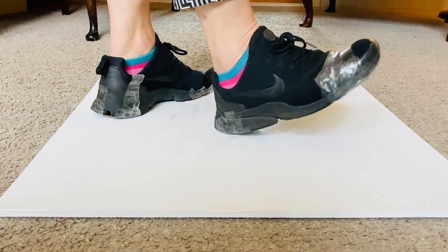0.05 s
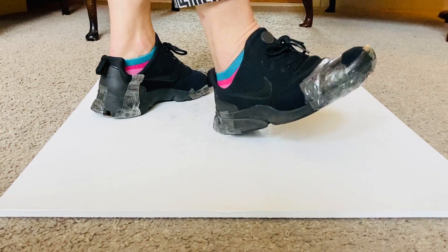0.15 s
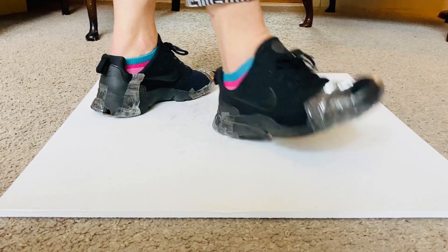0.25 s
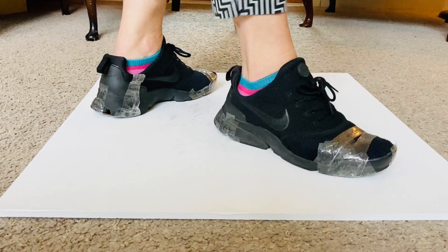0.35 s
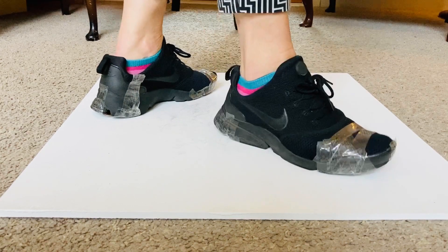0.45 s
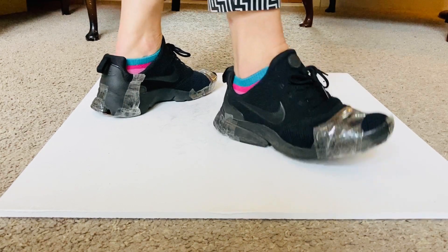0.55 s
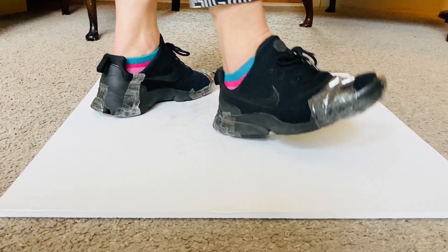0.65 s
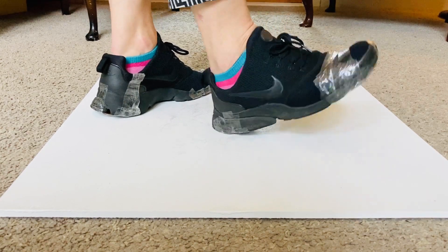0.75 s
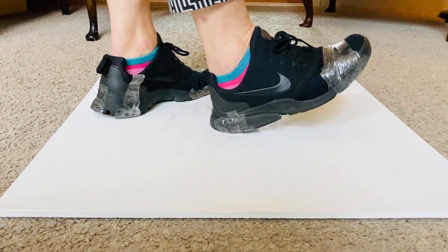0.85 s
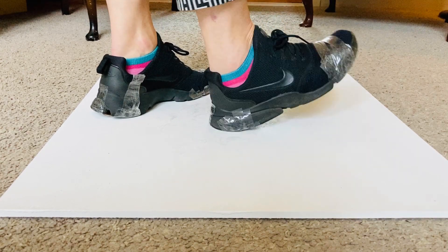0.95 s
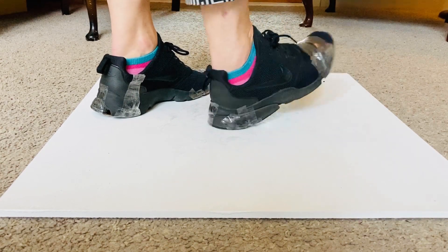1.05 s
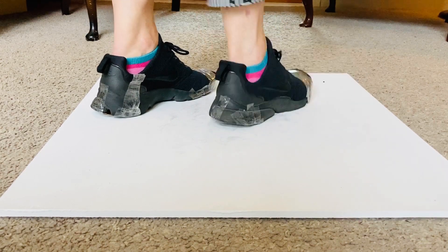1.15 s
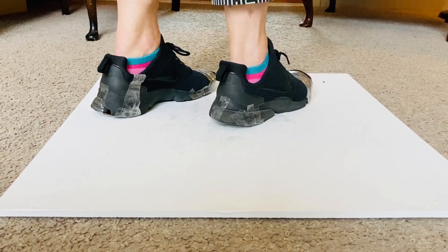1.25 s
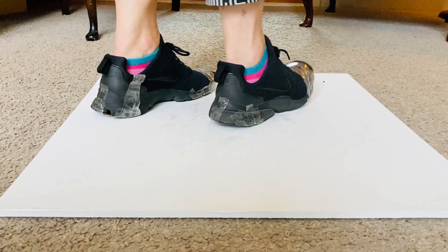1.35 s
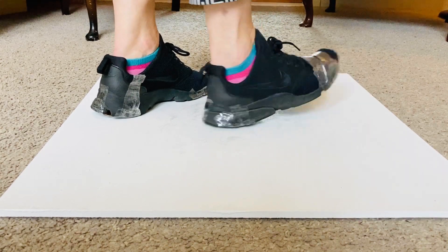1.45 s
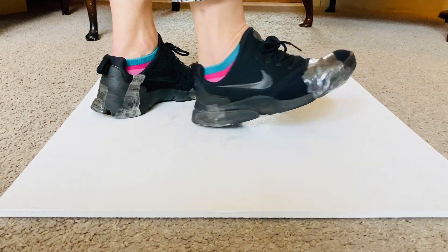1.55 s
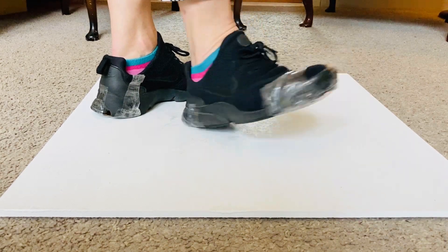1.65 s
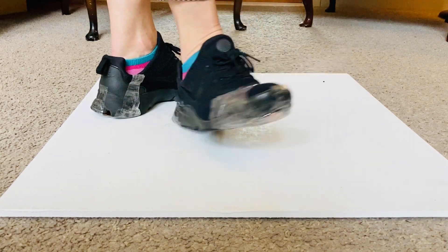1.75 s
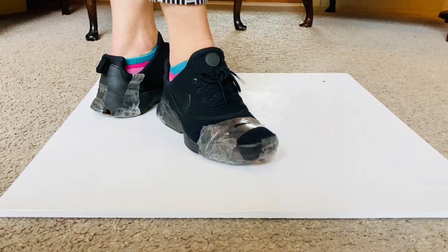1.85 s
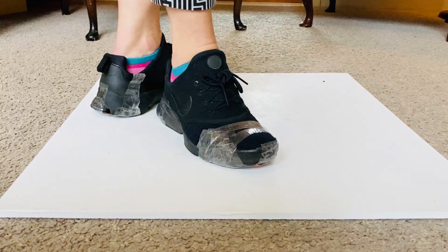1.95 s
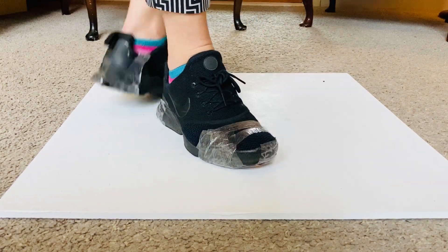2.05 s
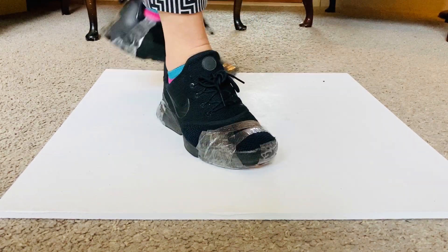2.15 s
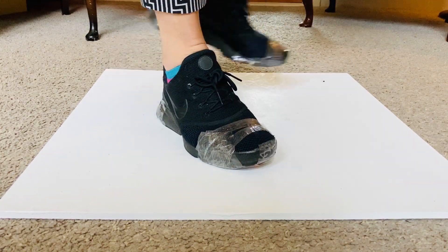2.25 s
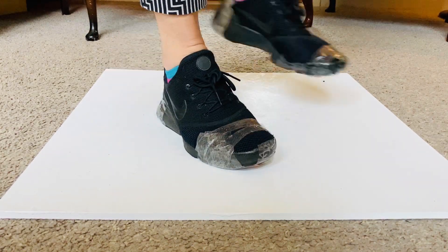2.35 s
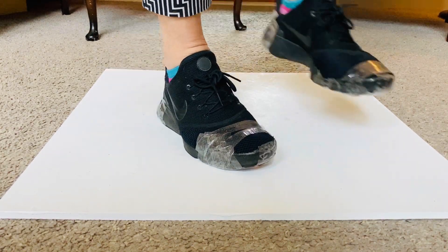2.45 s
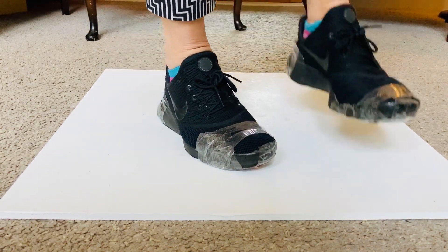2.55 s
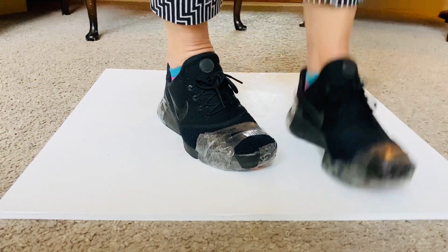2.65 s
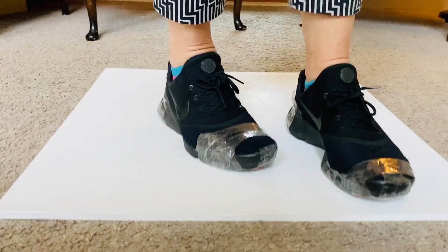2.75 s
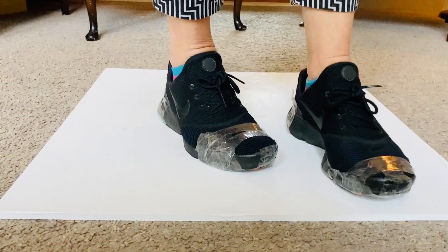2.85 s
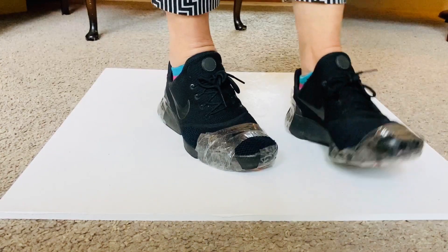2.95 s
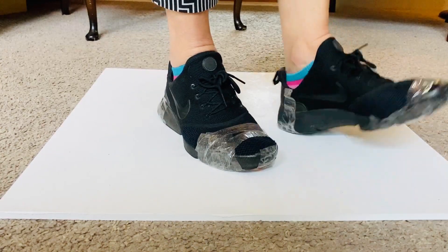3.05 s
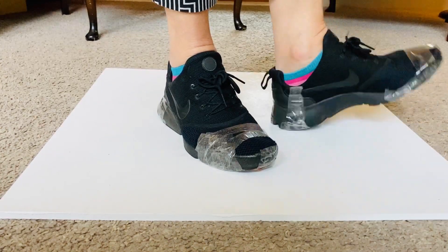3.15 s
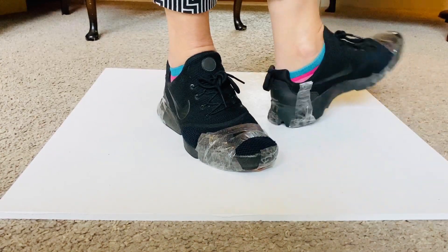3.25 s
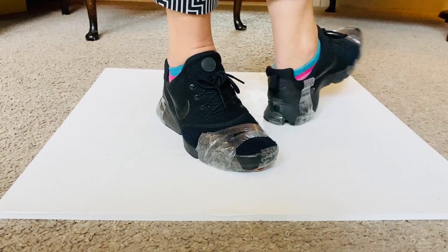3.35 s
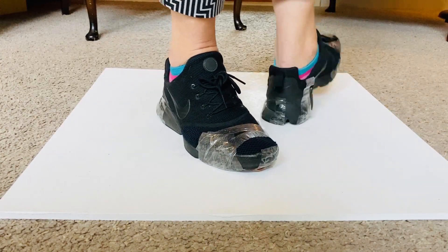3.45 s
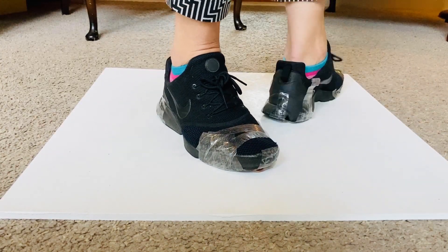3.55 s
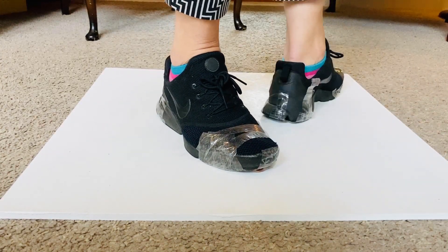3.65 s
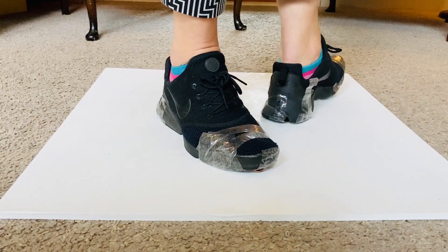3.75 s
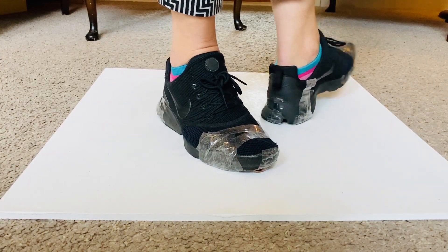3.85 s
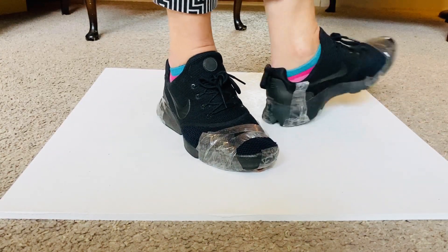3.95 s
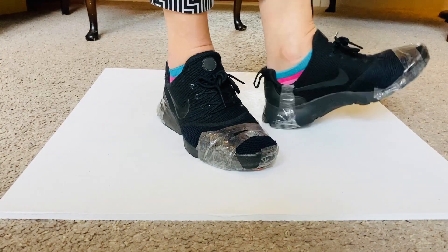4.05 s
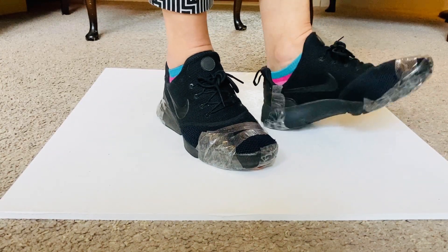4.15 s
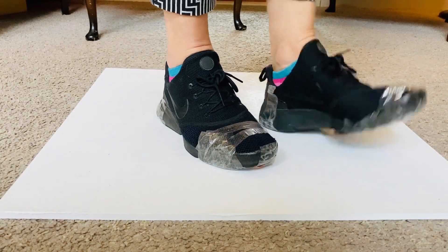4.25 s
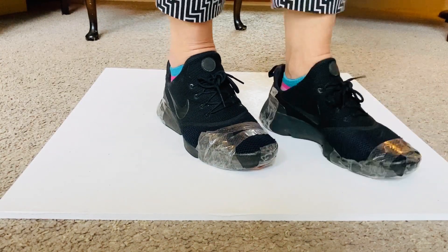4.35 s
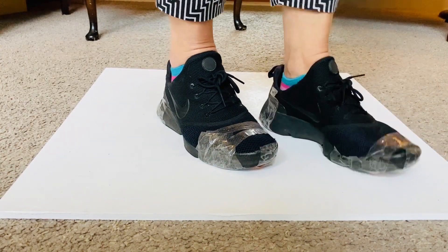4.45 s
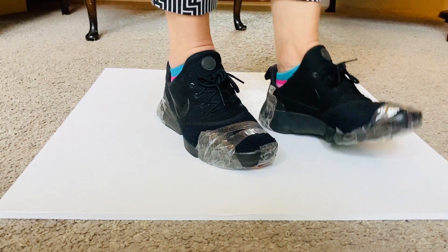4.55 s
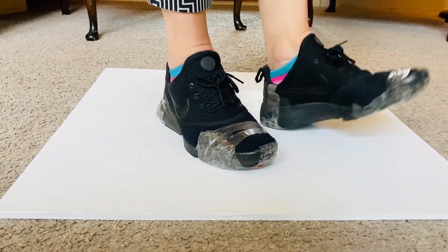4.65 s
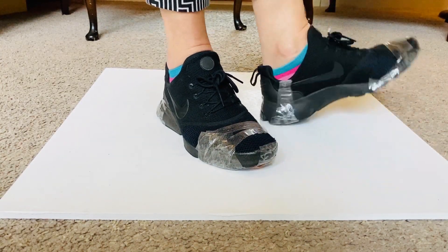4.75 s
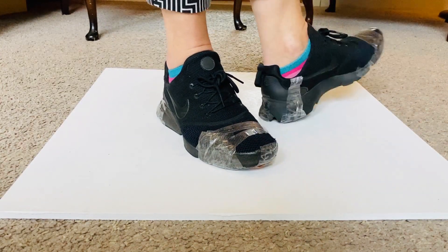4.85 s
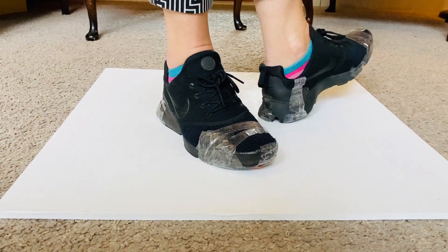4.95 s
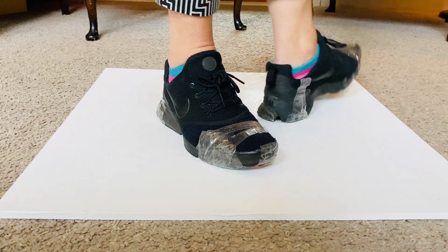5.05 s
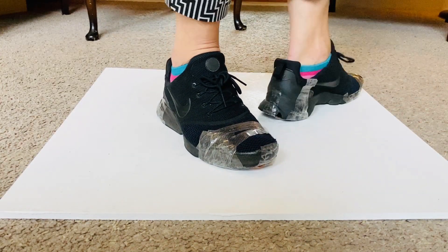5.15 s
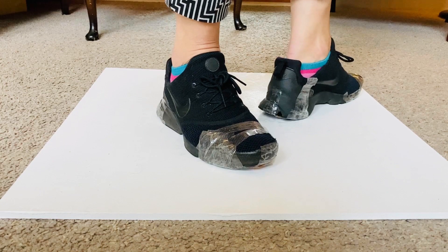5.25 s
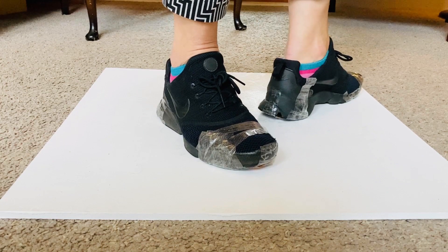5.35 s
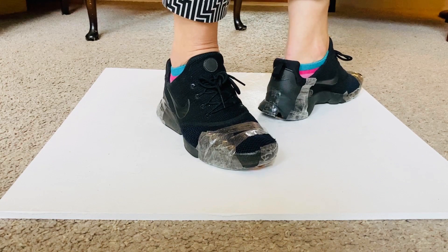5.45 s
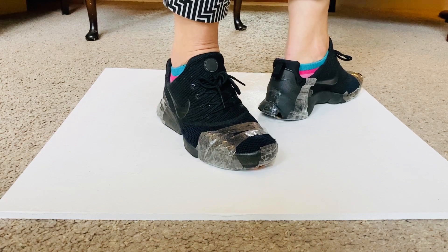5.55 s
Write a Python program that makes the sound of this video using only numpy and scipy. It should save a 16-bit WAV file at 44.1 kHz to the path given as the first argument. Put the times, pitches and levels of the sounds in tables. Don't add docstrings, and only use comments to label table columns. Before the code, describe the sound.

Seven evenly spaced foot taps clack sharply on a board over a carpeted floor, while plastic tape crackles and shoes softly rustle indoors.

```python
import sys
import numpy as np
from scipy import signal
from scipy.fft import rfft, irfft, next_fast_len
from scipy.io import wavfile

SR = 44100
rng = np.random.default_rng(int(sys.argv[2]) if len(sys.argv) > 2 else 0)


def volts_from_decibels(level):
    exponent = np.asarray(level, float) / 20
    return 10 ** exponent


def inscribe(sig):
    pcm = np.round(np.clip(np.atleast_2d(sig).T, -1, 1) * 32767)
    wavfile.write(sys.argv[1], SR, pcm.astype(np.int16))


N = 246959

# (time
# [s], level [dB], centre [Hz], spread [octaves], length [s])
DISC_CLACKS = [(0.4101, -12.5, 4000, 0.75, 0.0057), (0.4121, -16, 4530, 0.81, 0.0047),
               (1.2443, -18.5, 3700, 0.56, 0.0038), (1.2502, -14.5, 3960, 0.17, 0.0045),
               (1.961, -22, 3000, 1.4, 0.0026), (2.758, -35, 3490, 0.46, 0.028),
               (2.7646, -11, 4270, 0.56, 0.0052), (2.777, -13, 7670, 1.05, 0.0034),
               (3.619, -14.5, 4450, 0.14, 0.00057), (3.622, -13, 3880, 0.45, 0.0045),
               (4.4174, -11.5, 3700, 0.83, 0.007), (5.2018, -10.5, 4060, 0.55, 0.0046)]
# (time [s], lowest mode [dB], second mode [dB], third mode [dB], board bedding into the carpet [dB])
LANDINGS = [
    (0.4169, -25.5, -27, -30.5, -16.5),
    (1.2483, -25, -12, -17.5, -12),
    (1.96, -18, -24, -21, -28),
    (1.998, -25.5, -27.5, -33, -28),
    (2.5620, -52.5, -57, -51.5, -54),
    (2.7753, -14, -28.5, -24, -12.5),
    (3.625, -31, -27.5, -29, -12.5),
    (4.4192, -27, -15, -16.5, -15.5),
    (5.2050, -23.5, -27.5, -23, -12),
]
# (pitch [Hz], width [Hz], level [dB])
BRIGHT_TAPE = [(7570, 3270, 0.5), (10530, 5350, 5), (15200, 2200, -11)]
# (start [s], hold [s], level [dB], dull part above bright [dB])
SHOE_MOVES = [(0.0, 0.12, -60.5, -5.5), (0.4, .04, -54, 10.5), (0.729, 0.15, -60.5, 4),
              (1.01, 0.074, -55.5, -6.5), (1.164, .08, -55, 0), (1.53, 0.083, -53, -2.5),
              (1.71, 0.13, -59, 2), (1.926, 0.04, -46, 2.5), (2.179, 0.057, -52.5, 2.5),
              (2.47, .05, -67, -5.5), (3.006, 0.33, -58.5, 3), (3.515, 0.098, -55.5, -2.5),
              (3.962, .12, -56.5, -2), (4.12, 0.15, -62, 0.5), (4.369, 0.071, -49, 2),
              (4.672, .17, -58.5, 1), (5.088, .13, -57.5, 7.5), (5.421, 0.12, -68, 1)]
# (start [s], hold [s], creak [dB], rumble [dB], floor hum [dB])
WEIGHT_SHIFTS = [(0.0, 0.022, -54, -59.5, -59), (.8, 0.059, -76, -80.5, -59),
                 (.98, 0.17, -67.5, -73.5, -67), (1.533, 0.077, -61, -65, -59),
                 (1.712, 0.54, -56, -57.5, -66), (2.074, 0.056, -84, -70, -76),
                 (2.548, 0.051, -81, -74.5, -62), (2.974, .1, -65, -59, -43.5),
                 (3.17, 0.048, -58.5, -59.5, -49), (3.323, 0.17, -72, -73.5, -70.5),
                 (4.019, 0.3, -70.5, -67.5, -72), (4.706, 0.11, -86, -71.5, -67.5),
                 (4.879, 0.077, -73.5, -60, -75), (0.598, 0.066, -62.5, -61.5, -53),
                 (3.796, 0.031, -64.5, -74.5, -53)]

RISE_DB_PER_S, FALL_DB_PER_S, SHIFT_RISE_DB_PER_S, SHIFT_FALL_DB_PER_S = 230.5, 150.5, 109.5, 140
# (below the clack [dB], fall [dB/s], rest [dB])
BRIGHT, DULL, CREAK, RUMBLE = (35.7, 140, -74.5), (24.6, 125, -82.5), (29.5, 126.5, -91), (31, 109, -84.5)
HUM_BELOW_DB, HUM_FALL_DB_PER_S, HUM_REST_DB = 25.5, 75, -75.5
FAINT_SNAPS_PER_S, FAINT_ABOVE_DB = 16, 22
FOOT_PAN_DB, FEET_CHANGE_S = (3.5, 2.2), 2.5
UPPER_MODE_DB = -6.5
SPLIT_HZ, LEFT_LATE_S, CUTOFF_HZ = 5500, .000222, 16050


def at(s):
    return int(round(s * SR))


def rms_one(x):
    return x / np.sqrt(np.mean(x ** 2) + 1e-20)


def band(x, low_hz, high_hz):
    sos = signal.butter(2, [low_hz, min(high_hz, .45 * SR)], "band", fs=SR, output="sos")
    return signal.sosfilt(sos, x)


def ring(clicks, hz, t60):
    r, w = volts_from_decibels(-60 / (t60 * SR)), 2 * np.pi * hz / SR
    return signal.lfilter([0, np.sin(w)], [1, -2 * r * np.cos(w), r * r], clicks + 1e-18)


def body(clicks, peaks):
    out = 0
    for k, (hz, width, db) in enumerate(peaks):
        out = out + (-1) ** k * volts_from_decibels(db) * ring(clicks, hz, 6.6 / width)
    return out


def swell(start, hold, db, rise, fall, rest_db):
    t = np.arange(0, N, 64)[:, None] / SR
    lost = rise * np.clip(start - t, 0, None) + fall * np.clip(t - start - hold, 0, None)
    gain = np.sqrt(np.sum(volts_from_decibels(db - lost) ** 2, axis=1) + volts_from_decibels(rest_db) ** 2)
    return np.interp(np.arange(N) / SR, t[:, 0], gain)


def layer(rows, db, rise, fall, after_clack):
    below_db, clack_fall, rest_db = after_clack
    hits = np.array(DISC_CLACKS)
    moving = swell(rows[:, 0], rows[:, 1], db, rise, fall, rest_db)
    clattering = swell(hits[:, 0], 0, hits[:, 1] - below_db, 750, clack_fall, -np.inf)
    return np.hypot(moving, clattering)


def grains(per_s, spread_db):
    clumps = volts_from_decibels(1.8 * rms_one(band(rng.standard_normal(N), 8.0, 35.0)))
    present = rng.random(N) < per_s / SR
    sizes = volts_from_decibels(spread_db * np.minimum(rng.exponential(1, N), 5)) * present
    both, own = rng.standard_normal(N), rng.standard_normal((2, N))
    return clumps * sizes * (both + 1.7 * own)


def knocks():
    # (time [s], peak [dB], first pitch [Hz], last pitch [Hz], length [s])
    sole_hits = [
        (0.4061, -3.5, 1300, 399, 0.0039),
        (1.24, -8.5, 956, 387, 0.0043),
        (1.9531, -8.5, 1400, 398, 0.0035),
        (2.768, -7.5, 964, 306, 0.0049),
        (3.616, -14, 800, 300, 0.0027),
        (4.411, -3.5, 1620, 398, 0.0043),
        (5.199, -13, 1100, 400, 0.0023),
    ]
    out = np.zeros(N)
    t = np.arange(at(.03)) / SR
    for s, db, first_hz, last_hz, length in sole_hits:
        hz = last_hz + (first_hz - last_hz) * np.exp(-t / (0.2 * length))
        shape = (t / length) ** 0.69 * np.exp(-(t / length) ** 2 * 1.59) * 1.3
        out[at(s):at(s) + len(t)] -= volts_from_decibels(db) * shape * np.sin(2 * np.pi * np.cumsum(hz) / SR)
    return out


def clacks():
    out, size = np.zeros((3, N)), at(.05)
    t, pitches = np.arange(size) / SR, np.geomspace(1100, 11000, 18)
    for s, db, hz, spread, length in DISC_CLACKS:
        pan_db = FOOT_PAN_DB[int(s > FEET_CHANGE_S)]
        fading = 1 / (1 + (t / length) ** 6) + 0.24 * np.exp(-t / 0.02)
        pressing = np.clip(t / 0.00022, 0, 1) * fading
        burst = np.zeros((3, size))
        for k, pitch in enumerate(pitches):
            contacts = rng.standard_normal((3, size))
            hits = contacts * (rng.random(size) < .1) * pressing
            hits = hits[0] + 1.1 * hits[1:]
            hits = np.vstack([hits, (-1) ** k * (t == 0)])
            weight = np.exp(-.5 * (np.log2(pitch / hz) / spread) ** 2)
            burst += weight * ring(hits, pitch, 13.0 / pitch)
        burst = band(burst, 400, hz * 2 ** (7.2 * spread))
        burst /= np.sqrt(np.sum(burst ** 2, axis=1, keepdims=True) / (length * SR))
        burst[0] = np.roll(burst[0], shift=2)
        level_db = db + 0.5 + pan_db * np.array([[.5], [-.5], [0]])
        out[:, at(s):at(s) + size] += volts_from_decibels(level_db) * burst
    return out[:2], out[2]


def thumps():
    # (pitch [Hz], time to fade by 60 dB [s])
    floor_modes = [
        (54.7, 0.35),
        (78.17, 0.33),
        (113.7, 0.26),
        (140.3, 0.24),
        (107, .045),
    ]
    out, rows = np.zeros(N), np.array(LANDINGS)
    rows = np.insert(rows, 4, rows[:, 3] + UPPER_MODE_DB, axis=1)
    for k, (hz, t60) in enumerate(floor_modes):
        push = np.zeros(N)
        push[[at(s) for s in rows[:, 0]]] = -volts_from_decibels(rows[:, k + 1] + 3.0)
        out += ring(push, hz, t60) - ring(push, hz, t60 * 0.14)
    return band(band(out, 28, 410), 30, 2000)


def snaps():
    # (time [s], bright peak [dB], dull peak [dB])
    releases = [(0.3165, -36, -39.5), (0.3504, -36.5, -42), (0.3643, -39, -45), (0.376, -29.5, -24),
                (0.3856, -26, -22.5), (0.4015, -26.5, -28), (1.1218, -40.5, -56), (1.1463, -29, -46),
                (1.1613, -27.5, -56), (1.1659, -20.5, -27), (1.213, -21, -41), (1.2259, -13.5, -30),
                (1.2373, -20, -34), (1.9277, -28, -25), (2.749, -38.5, -39), (3.4531, -23, -45),
                (3.4879, -24.5, -32.5), (3.5403, -21, -47), (3.549, -23.5, -60), (3.5786, -16.5, -15.5),
                (3.6057, -18, -21), (4.3492, -17, -31.5), (4.3648, -15, -28.5), (4.3785, -19.5, -32),
                (4.394, -53.5, -22.5), (5.0437, -31.5, -53), (5.1101, -29, -25), (5.1661, -22.5, -43.5),
                (5.1816, -20, -33), (5.1882, -19.5, -44),
                (0.685, -31, -58), (0.7, -25, -31.5), (0.7353, -34, -51), (0.7508, -27, -53),
               (0.7594, -37, -33), (0.7739, -13, -38), (0.803, -39, -33), (0.835, -29, -29),
               (0.8734, -41, -43), (1.4587, -37, -53), (1.496, -35.5, -58), (1.523, -23, -32),
               (1.5597, -19.5, -49), (1.5743, -21.5, -29), (1.6518, -23.5, -57), (1.7086, -36, -35.5),
               (3.8558, -23.5, -63), (3.9015, -26.5, -41), (3.9523, -28, -32), (3.9666, -20.5, -31),
               (4.011, -27.5, -53), (4.1697, -32, -54), (4.6669, -32.5, -44), (4.6967, -25.5, -27),
               (4.7294, -19, -16), (4.76, -30.5, -50), (4.791, -52.5, -36), (4.8083, -34, -54.5),
               (4.8374, -29.5, -29.5), (4.8635, -45, -29.5),
                (0.01, -31, -31), (0.0641, -25.5, -53.5), (0.0723, -27.5, -43), (0.625, -34.5, -30.5),
               (1.978, -26, -39), (1.995, -31, -29), (2.0003, -21.5, -42), (2.041, -26.5, -72.5),
               (2.1313, -34, -54), (2.1799, -15.5, -23), (2.226, -28, -28.5), (2.315, -25.5, -36),
               (2.3737, -31, -57.5), (2.4583, -36, -55), (2.4743, -28, -32.5), (2.5265, -35, -49),
               (2.895, -29, -33), (2.961, -17, -39), (2.9763, -30, -35.5), (3.045, -28.5, -46.5),
               (3.144, -26, -37), (3.2676, -33, -51), (3.3136, -22, -43), (3.3354, -29, -29.5),
               (4.447, -13, -33), (4.5267, -32, -22.5), (4.5463, -26, -33), (5.3148, -28, -33.5),
               (5.4036, -23, -62), (5.45, -28, -51.5)]
    # (pitch [Hz], width [Hz], level [dB])
    dull_tape = [
        (2200, 1400, -1.5),
        (3700, 2200, -1.5),
    ]
    rows, out = np.vstack([releases, faint_snaps()]), 0
    luck = rng.random((240, 4))[:len(rows)]
    colour_db = 3.5 * rng.standard_normal((240, 5))[:len(rows)]
    contacts = (   # (delay [s], share of the first contact)
        (0 * luck[:, 1], 1), (0.00063 * luck[:, 1], .6),
        (0.003 * luck[:, 2], -.4), (0.00069 * luck[:, 3], .25))
    for k, (hz, width, peak_db) in enumerate(BRIGHT_TAPE + dull_tape):
        level_db = rows[:, 1] - 1.5 if k < len(BRIGHT_TAPE) else rows[:, 2] + 0.28
        sign = np.sign(luck[:, 0] - .5) * (-1) ** k
        first = volts_from_decibels(level_db + peak_db + colour_db[:, k]) * sign
        clicks = np.zeros(N)
        for late_s, share in contacts:
            np.add.at(clicks, np.round((rows[:, 0] + late_s) * SR).astype(int), share * first)
        out = out + ring(clicks, hz, 1.88 / width)
    return band(band(out, 1100, 18000), 900, 19000)


def faint_snaps():
    moves, luck = np.array(SHOE_MOVES), rng.random((120, 4))
    s = np.cumsum(-np.log(1 - luck[:, 0]) / FAINT_SNAPS_PER_S)
    rustle = swell(moves[:, 0], moves[:, 1], moves[:, 2], RISE_DB_PER_S, FALL_DB_PER_S, BRIGHT[2])
    rustle_db = 20 * np.log10(np.interp(s * SR, np.arange(N), rustle))
    db = rustle_db + FAINT_ABOVE_DB - 8 * luck[:, 1]
    return np.transpose([s, db, db - 18 * luck[:, 2]])[s < N / SR - .01]


def motion():
    moves, shifts = np.array(SHOE_MOVES), np.array(WEIGHT_SHIFTS)
    bright = layer(moves, moves[:, 2], RISE_DB_PER_S, FALL_DB_PER_S, BRIGHT)
    dull = layer(moves, moves[:, 2] + moves[:, 3], RISE_DB_PER_S, FALL_DB_PER_S, DULL)
    creak = layer(shifts, shifts[:, 2], SHIFT_RISE_DB_PER_S, SHIFT_FALL_DB_PER_S, CREAK)
    rumble = layer(shifts, shifts[:, 3], SHIFT_RISE_DB_PER_S, SHIFT_FALL_DB_PER_S, RUMBLE)
    out = volts_from_decibels(-2.5) * bright * rms_one(body(grains(per_s=2000, spread_db=-1.0), BRIGHT_TAPE))
    scuff = grains(per_s=3400, spread_db=2.0)
    out += volts_from_decibels(-1.7) * dull * rms_one(band(scuff, 2500, 4300) + 0.49 * band(scuff, 2100, 2700))
    out += creak * rms_one(band(grains(per_s=5100, spread_db=0.0), 510, 1600))
    return out + rumble * rms_one(band(rng.standard_normal(N), 94, 300))


def sway():
    shifts, lands = np.array(WEIGHT_SHIFTS), np.array(LANDINGS)
    slow = swell(shifts[:, 0], shifts[:, 1], shifts[:, 4],
                 SHIFT_RISE_DB_PER_S, SHIFT_FALL_DB_PER_S, HUM_REST_DB)
    landed_db = lands[:, 1:3].max(axis=1) - HUM_BELOW_DB
    landed = swell(lands[:, 0], 0, landed_db, 370, HUM_FALL_DB_PER_S, -np.inf)
    hum = rms_one(band(band(rng.standard_normal(N), 17, 85), 23, 160))
    return np.hypot(slow, landed) * hum


def room(x):
    # (centre [Hz], time to fade by 60 dB [s], level [dB], left-right likeness [0 to 1])
    echo_bands = [(180, 0.26, -28.5, 0.68), (315, 0.13, -43.5, 0.39), (700, 0.27, -36.5, .2),
                  (1400, 0.28, -36.5, .1), (2950, 0.36, -43.5, 0.068), (5640, 0.37, -42, 0.15),
                  (7960, 0.16, -47.5, .05), (12000, 0.2, -45, .05)]
    t, tail = np.arange(at(.6)) / SR, 0
    for hz, t60, db, alike in echo_bands:
        mid, side = band(rng.standard_normal((2, len(t))), hz / np.sqrt(2), hz * np.sqrt(2))
        alike = np.clip(alike, 0, 1)
        pair = np.sqrt(1 + alike) * mid + np.sqrt(1 - alike) * side * [[1], [-1]]
        tail = tail + volts_from_decibels(db - 60 * t / t60) * pair
    tail = tail * np.clip((t - .004) / 0.002, 0, 1)
    return signal.fftconvolve(x[None], tail, axes=1)[:, :N]


def scene():
    (metal, blows), board, tape = clacks(), knocks(), snaps()
    low = (thumps() + sway()) * volts_from_decibels([[-.6], [.6]])
    echo = room(0.43 * blows + 0.91 * metal[1] + board + 1.5 * tape)
    return metal + board + tape + low + motion() + echo


def roll_off(x):
    return signal.sosfilt(signal.butter(12, 17140, fs=SR, output="sos"), x)


def record(dry):
    size = next_fast_len(N + 64)
    hz, spectrum = np.arange(size // 2 + 1) * SR / size, rfft(dry, size)
    treble = 1 / (1 + (SPLIT_HZ / (hz + 1)) ** 12)
    late = -np.exp(-2j * np.pi * hz * LEFT_LATE_S)
    shared = np.sqrt(2) * spectrum.mean(axis=0) * np.array([late, np.ones(len(hz))])
    shared = shared + .1 * (spectrum - spectrum[::-1])
    mixed = np.sqrt(1 - treble) * spectrum + np.sqrt(treble) * shared
    mixed = mixed / (1 + (hz / CUTOFF_HZ) ** 60)
    mixed = mixed / (1 + (34 / (hz + 1)) ** 4)
    return roll_off(np.clip(irfft(mixed, size)[:, :N], -.97, .97))


dry = scene()
out = record(dry)
inscribe(out)
```